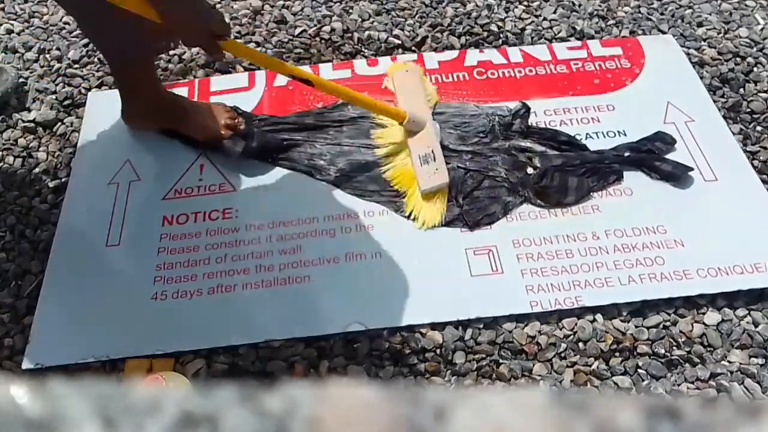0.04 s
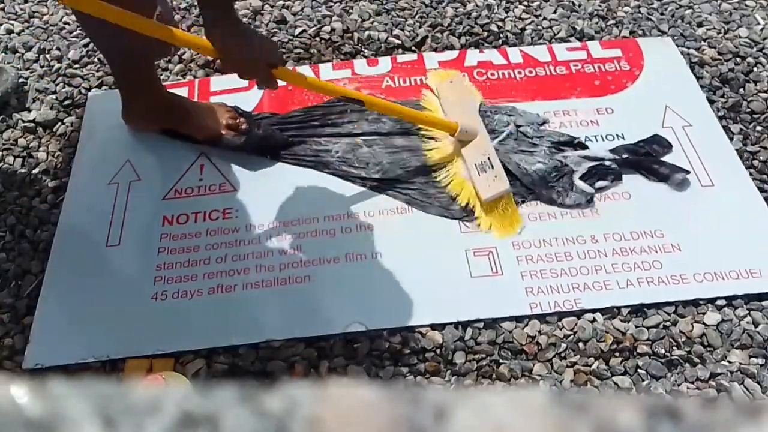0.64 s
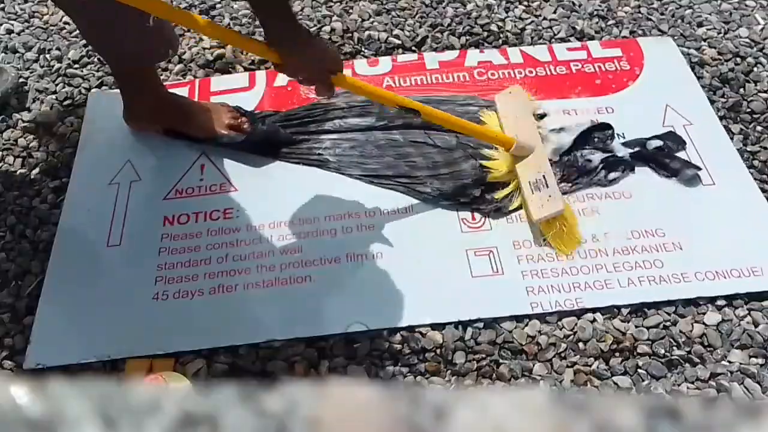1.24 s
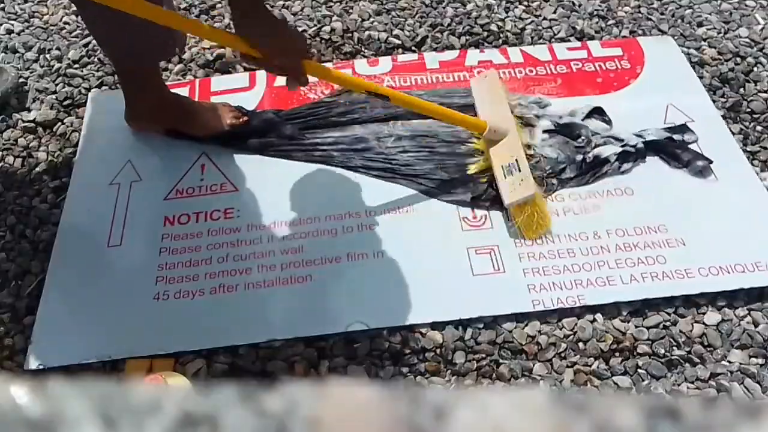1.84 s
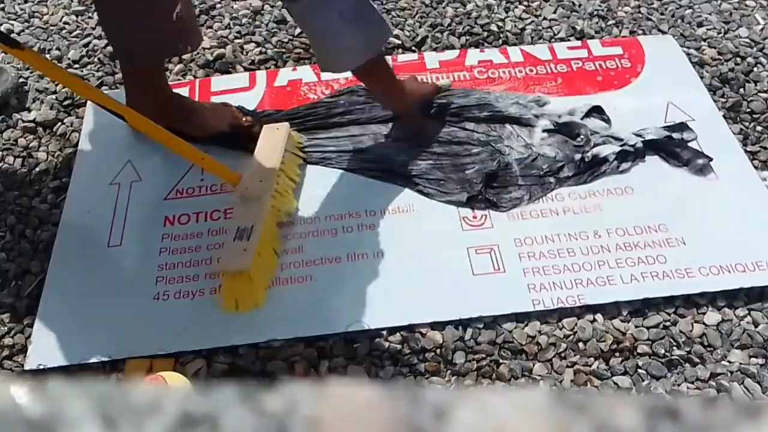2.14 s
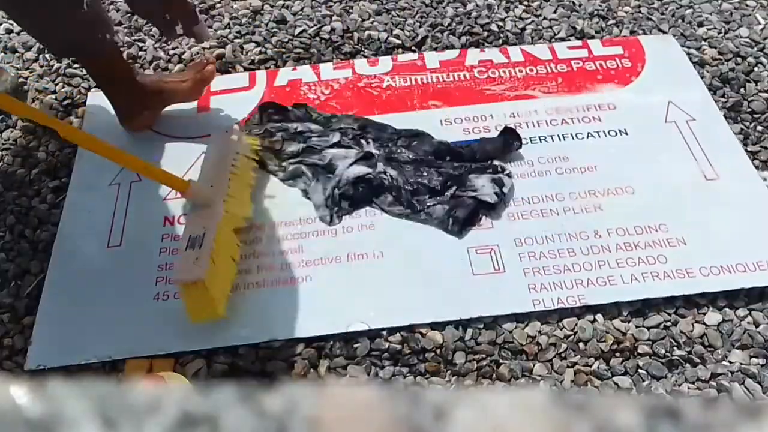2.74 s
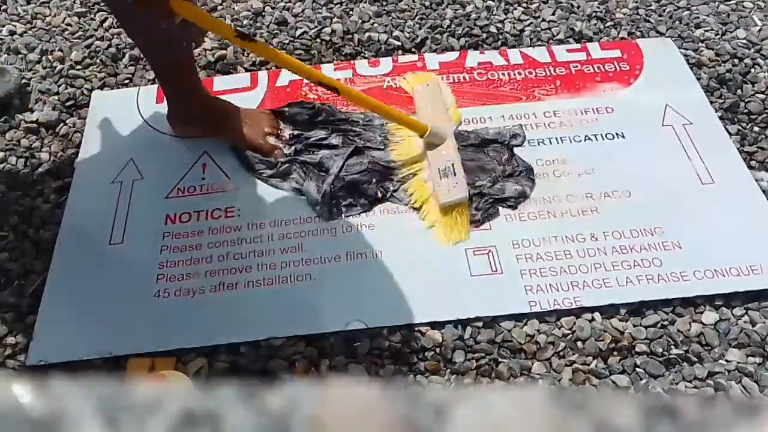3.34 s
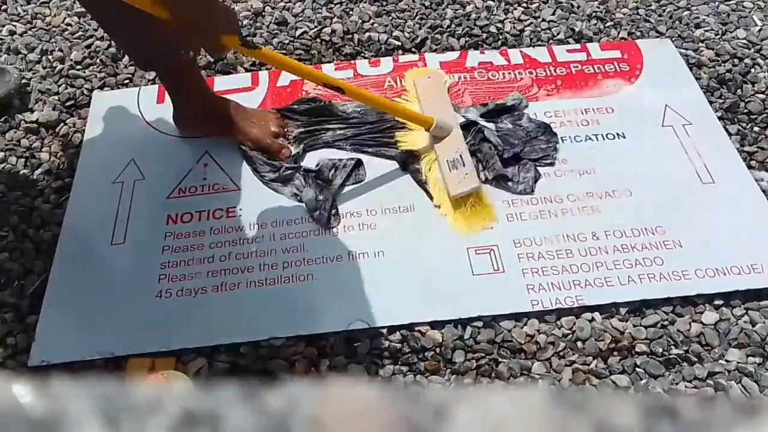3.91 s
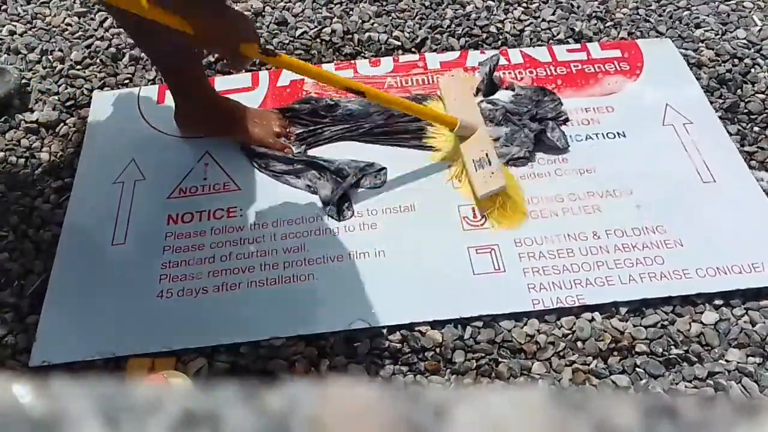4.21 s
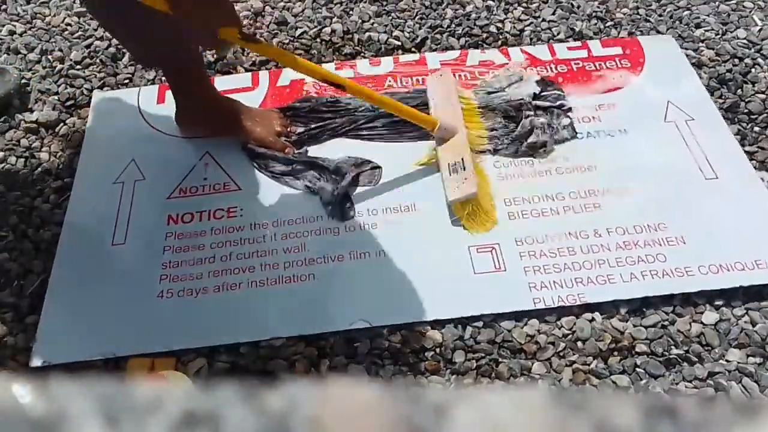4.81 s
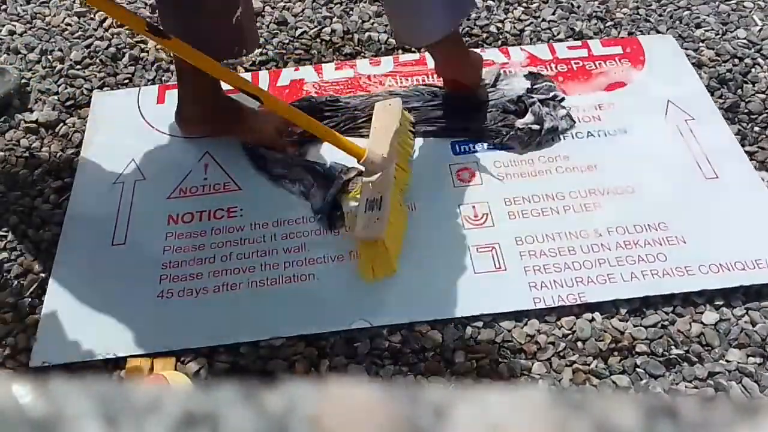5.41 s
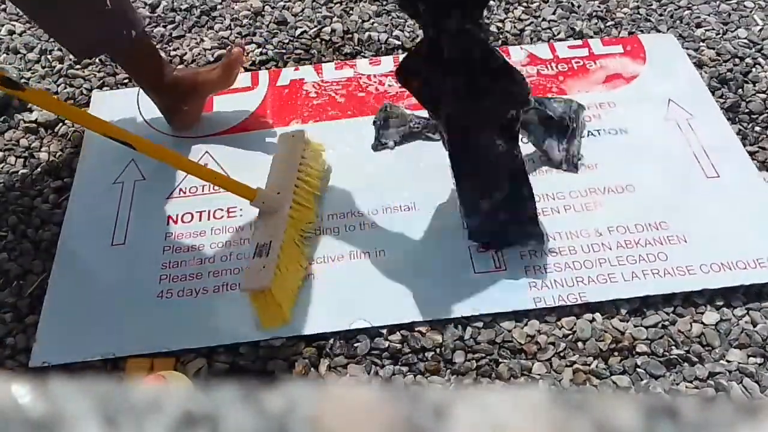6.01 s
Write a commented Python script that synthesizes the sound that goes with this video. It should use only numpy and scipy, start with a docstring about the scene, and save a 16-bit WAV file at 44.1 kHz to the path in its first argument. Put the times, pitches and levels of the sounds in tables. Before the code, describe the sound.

From the start, a stiff broom scrubs a wet cloth on a flat panel, close to the microphone, at three to four pushes a second. The light pulls hiss; the heavier pushes also rasp and drum on the panel, with short knocks and judders from the broom head. Single bristles snap around 1.5 seconds. At about 2 seconds the scrubbing stops and the cloth is lifted with a quiet fizz and squelch, then slapped down wetly near 2.8 seconds. Scrubbing resumes around 2.9 seconds with a heavy, knocking push and continues in quick strokes, with sharp bristle ticks near 4.7 seconds. It fades by 5.2 seconds. Soft squelching follows, and the cloth slaps down again just after 6 seconds. Bare feet thump softly a few times, and a faint, steady outdoor rush runs throughout.

```python
"""First comes the hiss of a stiff broom, scrubbing a wet cloth to and fro on a panel that lies on gravel.
Light pulls hiss as the bristles slip; heavy pushes also rasp and drum on the panel. The broom head knocks
and judders, bare feet thump softly and single bristles snap. In two pauses the cloth is picked up,
squelches and is slapped down again. It all happens outdoors, over a faint, steady background rush."""
import sys
import numpy as np
from scipy import signal
from scipy.fft import rfft, irfft
from scipy.io import wavfile
from scipy.ndimage import map_coordinates

SR = 44100
rng = np.random.default_rng(int(sys.argv[2]) if len(sys.argv) > 2 else 0)


def persist_wave(psi):
    """Save psi, clipped to +-1, as 16-bit WAV."""
    counts = np.round(np.clip(psi, -1, 1) * 32767).astype(np.int16)
    wavfile.write(sys.argv[1], SR, np.atleast_2d(counts).T)


N = 271656
TIME = np.arange(N) / SR
TOP_HZ = 15700  # the microphone cuts the sound above this

# Levels compare the rows of one table; the functions set how loud each sound is in the end.
# the broom is shoved forward: start t/s, end t/s, hiss level/dB, level/dB of the weight leant on it
BROOM_PUSHES = [(-.015, 0.178, -38.5, -1.5), (0.284, 0.43, -39.5, 2.5), (0.562, 0.714, -40.5, -3),
                (0.841, 0.975, -37.5, 0), (1.11, 1.253, -40, 3), (1.359, 1.568, -38.5, 3.5),
                (1.654, 1.797, -41, 4.5), (1.936, 2.055, -45.5, -24), (2.878, 3.108, -53.5, 20),
                (3.066, 3.207, -40, 8.5), (3.326, 3.435, -36, 2.5), (3.542, 3.693, -45, 7),
                (3.819, 3.938, -45, 6), (4.085, 4.207, -43, 3), (4.357, 4.497, -43, 3.5),
                (4.642, 4.777, -42, 5), (4.904, 5.023, -43.5, 2)]
# the broom is drawn back lightly: start t/s, end t/s, hiss level/dB
BROOM_PULLS = [(0.174, 0.283, -40), (0.445, 0.566, -42), (0.736, .845, -41), (1.003, 1.116, -40.5),
               (1.274, 1.365, -39.5), (1.559, 1.663, -41.5), (1.812, 1.943, -49.5), (3.22, 3.328, -42),
               (3.456, 3.554, -41.5), (3.724, 3.816, -46.5), (3.965, 4.106, -47), (4.248, 4.361, -47),
               (4.518, 4.651, -45.5), (4.796, 4.904, -45), (5.0, 5.238, -55)]
# tone of slipping bristles: f/Hz, level/dB
HISS_TONE = [(100, -43), (1500, -11), (3000, -4.5), (4700, -11), (6000, -5.5), (7300, -1), (8900, 2.5),
             (10000, -5.5), (11000, -23), (13000, -20), (15500, -36.5)]
# tone of fast bristle tips: f/Hz, level/dB
SIZZLE_TONE = [(100, -47), (7000, -28.5), (9500, -2), (10700, 1), (12800, 5.5), (14000, 0.5), (15500, -6.5)]
# tone of bristles rubbing the cloth: f/Hz, level/dB
RASP_TONE = [(50, -40), (150, -18), (350, -1.5), (520, -13), (700, -3.5), (1100, 4), (1900, 1),
             (2500, -3.5), (3500, -8), (5000, -17), (9000, -49)]
# notes of the composite panel, cut short by the gravel: f/Hz, level/dB, time to fade by 60 dB t/s
PANEL_NOTES = [(148, -42.5, .07), (197, -22, 0.17), (248, 4, 0.093), (265.3, -4, 0.38), (281.2, 6.5, 0.055),
               (341, -1, 0.099), (410, -3, 0.077), (476.5, 0, 0.085), (477, -22, 0.076), (625, -5.5, 0.05),
               (719, -12.5, 0.16), (858, -30, 0.074)]
# tone of the faint background rush: f/Hz, level/dB
BACKGROUND_TONE = [(25, -38), (55, -30), (90, -16), (130, -4.5), (200, 1), (265, 2), (350, -10),
                   (520, -9.5), (700, -11), (1100, -12.5), (2000, -19.5), (2700, -26), (3300, -41.5),
                   (5200, -48), (8500, -45), (15000, -59)]
# broom head or cloth hits the panel: t/s, thud level/dB, crack level/dB on top of that, judder t/s
BLOWS = [(0.015, -21.5, -28, 0.0053), (0.109, -15.5, -20, 0.0068), (0.157, -20, -25, 0.0064),
         (0.368, -5.5, -9, 0.013), (0.395, -16.5, -8.5, 0.0058), (0.715, -20, -24, 0.0071),
         (0.906, -28.5, 4, 0.0047), (0.943, -16, -13.5, 0.01), (1.206, -6, -15, 0.01),
         (1.363, -20.5, -39, 0.005), (1.41, -21.5, -36, 0.0041), (1.482, -14.5, -29, 0.01),
         (1.507, -11.5, -9.5, 0.017), (1.757, -21.5, -22, 0.0096), (1.787, -15.5, -15.5, 0.0062),
         (1.971, -19.5, -14.5, 0.0062), (2.11, -18.5, -26, 0.0085), (2.132, -19.5, -40, 0.0082),
         (2.755, -15.5, -10.5, 0.0078), (2.877, -21, -10, 0.013), (2.968, -16, -5, 0.022),
         (3.017, -8.5, -1.5, 0.0084), (3.052, -9, -21, 0.031), (3.1, -11.5, -22, .007),
         (3.407, -14.5, -18, 0.0026), (3.906, -20, -4.5, 0.0083), (4.178, -21.5, -13, 0.0072),
         (4.269, -27, -14, 0.0023), (4.449, -14, -12, 0.0057), (4.73, -6, -9.5, 0.0058),
         (4.739, -7.5, -22, 0.0028), (4.78, -16.5, -15, 0.0029), (4.986, -8.5, -13.5, 0.0073),
         (6.15, -5, 0, 0.0045)]
# tone of the wet crack in a blow: f/Hz, level/dB
CRACK_TONE = [(60, -34), (200, -17), (500, 9), (800, 0.5), (1250, 4.5), (1850, 2.5), (2500, -5.5),
              (4000, -15.5), (6000, -19.5), (9000, -14.5), (15000, -51.5)]
# dull footfalls at the edge of the panel: t/s, level/dB
FOOTFALLS = [(0.315, -35.5), (1.687, -34), (2.940, -31), (5.61, -37.5)]
# soapy water is forced through the weave: middle t/s, half length t/s, middle f/Hz, width f/Hz, level/dB
WATER_SQUIRTS = [(0.844, 0.019, 2490, 350, -43), (0.845, 0.016, 3560, 400, -46),
                 (2.202, 0.0067, 585, 350, -37), (2.416, 0.012, 8200, 1300, -56),
                 (5.41, 0.011, 482, 119, -42), (5.798, 0.034, 8140, 800, -60.5)]
# the wet cloth is gripped, lifted or dropped: start t/s, end t/s, fizz level/dB, squelch level/dB
CLOTH_MOVES = [(2.08, 2.298, -60, -51.5), (2.365, 2.58, -69, -59.5), (2.731, 2.804, -44.5, -32.5),
               (2.797, 2.958, -57, -52.5), (5.565, 5.743, -54.5, -57), (5.74, 5.922, -69, -54),
               (6.006, 6.03, -50, -47), (6.025, 6.057, -39.5, -46.5), (6.054, 6.182, -50, -45),
               (6.131, 6.26, -32.5, -33.5)]
# tone of crackling foam: f/Hz, level/dB
FIZZ_TONE = [(1500, -4), (3000, -5), (4200, -8), (5500, -8.5), (7000, -0.5), (8700, 1), (10000, -6),
             (12000, -20), (15500, -20)]
# tone of water pressed out of the folds: f/Hz, level/dB
SQUELCH_TONE = [(50, -21), (150, -11), (400, 14.5), (800, 4.5), (1800, -4), (3000, -7), (5000, -27),
                (9000, -27)]
# bent bristles spring free: t/s, level/dB
BRISTLE_SNAPS = [(1.474, -12.5), (1.511, -10.5), (1.533, -15), (1.803, -21), (2.879, -29), (2.975, -19),
                 (3.020, -13), (3.905, -14), (4.717, 0.5), (4.744, -8.5), (4.985, -22)]
# tone of a snapping bristle: f/Hz, level/dB
SNAP_TONE = [(100, -53), (1000, -2), (4000, -14), (7000, 0), (9500, -3), (12500, -7), (16000, -19)]


def undb(db):
    """Turn decibels into a gain, the number a sound is multiplied by."""
    return 10 ** (np.asarray(db) / 20)


def unit(x):
    """Scale a sound so that its average strength (rms) is 1."""
    return x / np.sqrt(np.mean(x ** 2))


def add(track, s, sound):
    """Mix a sound into the track, starting at s seconds."""
    i = max(int(s * SR), 0)
    track[i:i + len(sound)] += sound[:max(N - i, 0)]


def colour(x, tone, size=4096):
    """Make each frequency louder or softer, following a table of f/Hz, level/dB."""
    hz, db = np.transpose(tone)
    grid_hz = np.maximum(np.fft.rfftfreq(size, 1 / SR), 1)
    gain = undb(np.interp(np.log(grid_hz), np.log(hz), db))
    # this folding makes the filter ring only after a tap, never before it
    folded = irfft(np.log(gain))
    folded[1:size // 2] *= 2
    folded[size // 2 + 1:] = 0
    tap_response = irfft(np.exp(rfft(folded)))
    return signal.fftconvolve(x, tap_response)[:len(x)]


def band(x, hz, width_hz):
    """Keep the frequencies around hz and fade out the rest."""
    edges = np.clip([hz - width_hz / 2, hz + width_hz / 2], 20, .49 * SR)
    return signal.sosfilt(signal.butter(2, edges, "band", fs=SR, output="sos"), x)


def wander(rate):
    """Drift at random, roughly between -1 and 1, heading for a new value rate times a second."""
    return 1.2 * np.interp(TIME * rate, np.arange(N), rng.standard_normal(N))


def ticks(rate, spread_db):
    """Tiny slips of unequal size at random moments, about rate of them a second."""
    clicks = (rng.random(N) < rate / SR) * rng.choice([-1, 1], N)
    sizes = undb(spread_db * np.clip(rng.standard_normal(N), -3, 3))
    return unit(clicks * sizes)


def swing(start, end, peak, fullness=0.8):
    """One move of the arm rises from 0 to 1 and falls back; peak=0.5 puts the top halfway through."""
    top = start + peak * (end - start)
    return np.sin(np.pi / 2 * np.interp(TIME, [start, top, end], [0, 1, 0])) ** fullness


def linger(gain, tail_s):
    """The level of suds that are stirred up and then die away."""
    keep = np.exp(-1 / (tail_s * SR))
    return np.sqrt(signal.lfilter([1 - keep], [1, -keep], gain ** 2))


def strokes(suds_db=-14, suds_s=0.081, brisk_db=-42):
    """Gains of hiss, sizzle, rasp and drumming: speed makes the high sounds, weight the low ones."""
    hiss, rasp, drum = np.zeros((3, N))
    for start, end, db in BROOM_PULLS:
        speed = undb(db) * swing(start, end, peak=0.66)
        own_weight = undb(-5.5) * speed
        hiss += speed
        rasp += own_weight
        drum += own_weight
    for start, end, db, weight_db in BROOM_PUSHES:
        hiss += undb(db) * swing(start, end, peak=0.41)
        load = undb(db) * swing(start, end, peak=0.54, fullness=1.23)  # weight comes later than speed
        rasp += undb(0.54 + 0.45 * weight_db) * load
        drum += undb(weight_db) * load
    # in a brisk stroke the tips sizzle; this grows faster than the hiss
    sizzle = undb(-48.5) * (hiss / undb(brisk_db)) ** 1.55
    gains = np.array([hiss, sizzle, rasp, drum])
    return np.hypot(gains, undb(suds_db) * linger(gains, suds_s))


def shimmer(x, depth_db, rate, bands=16):
    """Different bristles keep touching down, so each range of frequencies swells and fades on its own."""
    hz = np.fft.rfftfreq(N, 1 / SR)
    place = np.interp(np.sqrt(hz), np.sqrt([0, TOP_HZ]), [0, bands - 1])
    spectrum, out = rfft(x), np.zeros(N)
    for k in range(bands):
        share = np.maximum(1 - abs(place - k), 0)
        out += irfft(spectrum * share, N) * undb(depth_db * wander(rate))
    return unit(out)


def panel_ring(scatter_db, detune, low_cut_hz=155, high_cut_hz=1600, size=11000):
    """The panel rings after one tap; where the tap lands changes how strong each note is."""
    hz, db, fade_s = np.transpose(PANEL_NOTES)[:, :, None]
    t = np.arange(size) / SR
    strength, shift = rng.standard_normal((2, len(PANEL_NOTES), 1))
    fades = undb(db + scatter_db * strength) * np.exp(-np.log(1000) * t / fade_s)
    ring = np.sum(fades * np.cos(2 * np.pi * hz * (1 + detune * shift) * t), axis=0)
    # the ring starts softly, without a sharp click
    ring = signal.sosfilt(signal.butter(2, high_cut_hz, fs=SR, output="sos"), ring)
    # low notes are weak because air just flows round the edge of the panel
    return signal.sosfilt(signal.butter(4, low_cut_hz, "high", fs=SR, output="sos"), ring)


def scrubbing():
    """Hundreds of bristles slip over the wet cloth; whole tufts catch, let go and shake the panel."""
    hiss_gain, sizzle_gain, rasp_gain, drum_gain = strokes()
    tufts = wander(170)
    slips = ticks(10000, spread_db=2.5) * undb(2 * tufts)
    hiss = undb(-0.76) * hiss_gain * shimmer(colour(slips, HISS_TONE), depth_db=3, rate=35)
    sizzle = sizzle_gain * shimmer(colour(slips, SIZZLE_TONE), depth_db=3.5, rate=28)
    rubs = ticks(2500, spread_db=2) * undb(2.5 * tufts)
    fold_pops = undb(-12.5) * ticks(90, spread_db=2.5)  # soaked folds pop under the bristles
    rasp = undb(0.6) * rasp_gain * shimmer(colour(rubs + fold_pops, RASP_TONE), depth_db=1.5, rate=30)
    ring = panel_ring(scatter_db=1.5, detune=0)
    taps = undb(3) * drum_gain * ticks(900, spread_db=1)
    drumming = signal.fftconvolve(taps, ring / np.linalg.norm(ring))[:N]
    # the lather keeps seething while the broom turns round
    bubbles = unit(band(ticks(2200, spread_db=1.5), hz=3200, width_hz=3400))
    lather = undb(-15.5) * linger(hiss_gain, tail_s=0.1) * bubbles
    return hiss + sizzle + lather + rasp + drumming


def panel_echo(x, lag_s=0.0016, sway=0.35, echo_db=-15):
    """Sound also bounces off the panel; its detour changes as the broom moves."""
    detour_s = lag_s * np.exp(sway * wander(5))
    echo = undb(echo_db) * map_coordinates(x, [(TIME - detour_s) * SR], order=3)
    return (x + echo) / np.sqrt(1 + undb(echo_db) ** 2)


def background(level_db=-42.5):
    """A faint, steady background rush that wavers a little and is cut off sharply above 3 kHz."""
    return undb(level_db + 0.37 * wander(14)) * unit(colour(rng.standard_normal(N), BACKGROUND_TONE))


def knocks(crack_swell_s=0.0018, crack_fade_s=0.0087, damping_s=0.034, size=4000):
    """Each blow rings the panel with a short push and a judder of tufts, and makes a wet crack."""
    out, t = np.zeros(N), np.arange(size) / SR
    for s, thud_db, crack_db, judder_s in BLOWS:
        grain, splash = rng.standard_normal((2, size))
        # a blow cushioned by the cloth cracks less and pushes longer
        contact_s = 0.00033 * undb(-0.52 * (crack_db + 19))
        push = t / contact_s * np.exp(-t / contact_s)
        judder = grain * t * np.exp(-t / judder_s)
        force = push + signal.fftconvolve(judder / np.linalg.norm(judder), push)[:size]
        ring = panel_ring(scatter_db=4, detune=0.047)
        # the broom stays pressed on the panel and cuts its ring short
        ring *= np.exp(-np.arange(len(ring)) / SR / damping_s)
        thud = signal.fftconvolve(force, ring)
        swell = 1 - np.exp(-t / crack_swell_s)  # the crack grows as the contact spreads
        crack = unit(colour(splash, CRACK_TONE)) * swell * np.exp(-t / crack_fade_s)
        add(out, s, undb(thud_db + 20) * thud / np.linalg.norm(thud))
        add(out, s, undb(thud_db + crack_db) * crack)
    return out


def footsteps(hz=125, swell_s=0.0065, size=4000):
    """A bare foot thumps softly as the weight shifts."""
    out, t = np.zeros(N), np.arange(size) / SR
    thump = t / swell_s * np.exp(1 - t / swell_s) * np.sin(2 * np.pi * hz * t)
    for s, db in FOOTFALLS:
        add(out, s, undb(db) * thump)
    return out


def wet_cloth():
    """Water squirts through the weave; when the cloth is handled, foam crackles and the folds squelch."""
    fizz = unit(colour(ticks(2000, spread_db=3.5), FIZZ_TONE))
    squelch = unit(colour(ticks(1500, spread_db=6), SQUELCH_TONE))
    out = np.zeros(N)
    for s, half_s, hz, width_hz, db in WATER_SQUIRTS:
        swell = np.exp(-((TIME - s) / half_s) ** 2 / 2)
        out += undb(db) * swell * unit(band(rng.standard_normal(N), hz, width_hz))
    for start, end, fizz_db, squelch_db in CLOTH_MOVES:
        grip = swing(start, end, peak=0.18)  # presses water out quickly, then eases
        out += grip * (undb(fizz_db) * fizz + undb(squelch_db + 4.5) * squelch)
    return out


def bristle_snaps(tick_hz=9500, tick_s=0.000092, rattle_db=-17, rattle_s=0.0016, size=1500):
    """A bristle flicks against the panel with one sharp tick and rattles its neighbours."""
    out, t = np.zeros(N), np.arange(size) / SR
    tick = 1.3 * np.exp(-t / tick_s) * np.sin(2 * np.pi * tick_hz * t)
    for s, db in BRISTLE_SNAPS:
        rattle = undb(rattle_db) * np.exp(-t / rattle_s) * rng.standard_normal(size)
        add(out, s, undb(db) * (tick + rattle))
    return undb(3) * colour(out, SNAP_TONE)


def scene():
    """The scrubbing happens close to the microphone, in the open air."""
    broom_and_cloth = panel_echo(scrubbing() + wet_cloth())
    return (broom_and_cloth + knocks() + bristle_snaps() + footsteps() + background())[None]


def record(dry, low_cut_hz=55):
    """The microphone thins the lowest sounds, rounds off the loudest peaks and cuts the highest sounds."""
    thin = signal.sosfilt(signal.butter(1, low_cut_hz, "high", fs=SR, output="sos"), dry)
    rounded = 0.8 * np.tanh(thin / 0.8)
    return signal.sosfilt(signal.ellip(8, 0.2, 80, TOP_HZ, fs=SR, output="sos"), rounded)


dry = scene()
out = record(dry)
persist_wave(out)
```